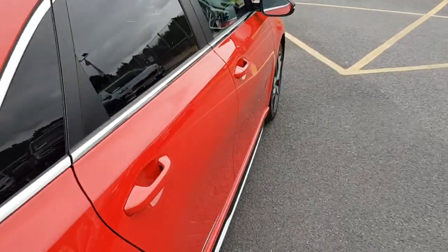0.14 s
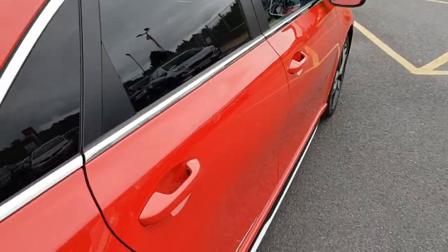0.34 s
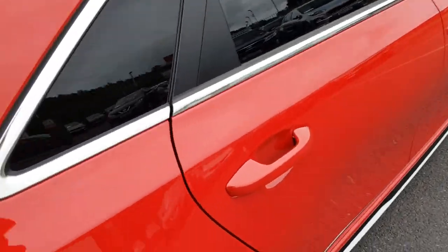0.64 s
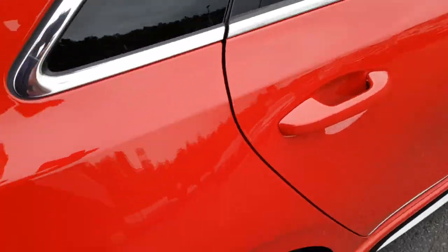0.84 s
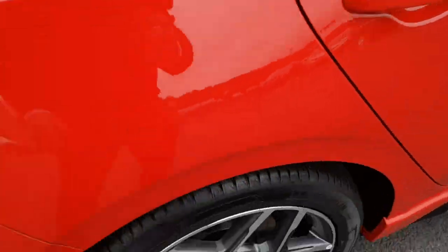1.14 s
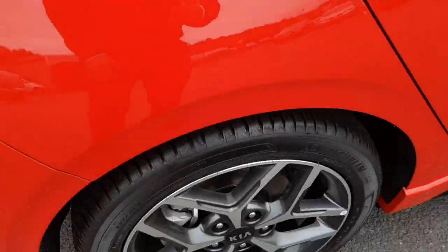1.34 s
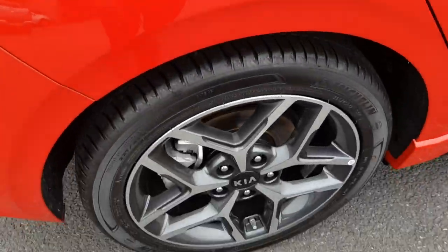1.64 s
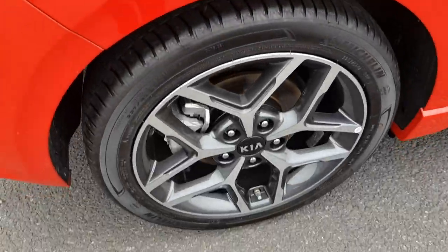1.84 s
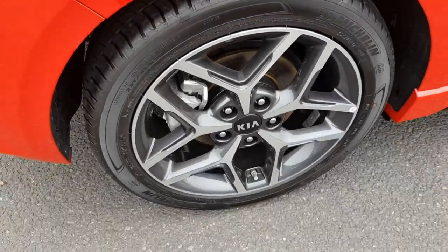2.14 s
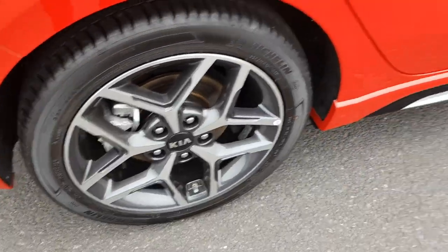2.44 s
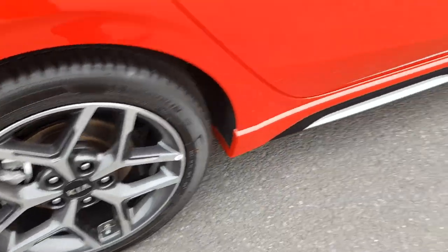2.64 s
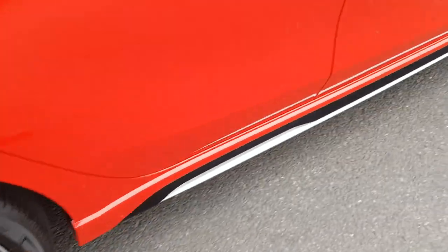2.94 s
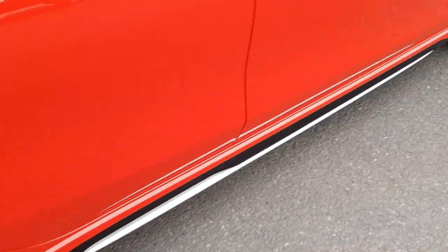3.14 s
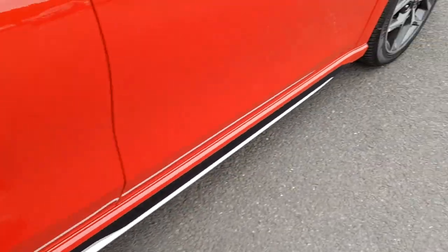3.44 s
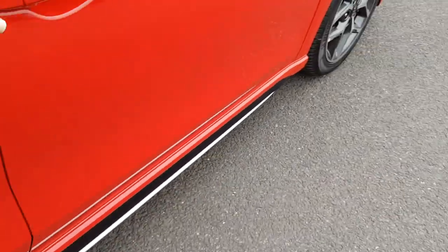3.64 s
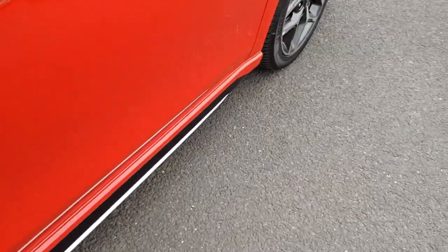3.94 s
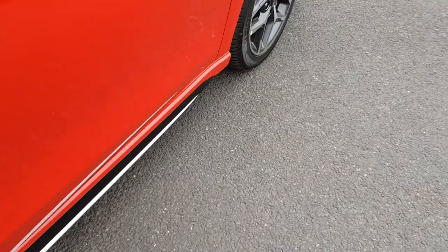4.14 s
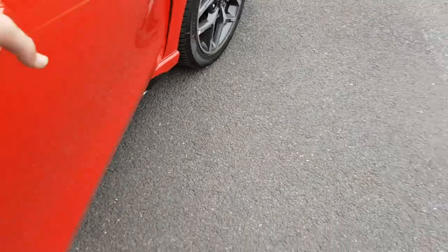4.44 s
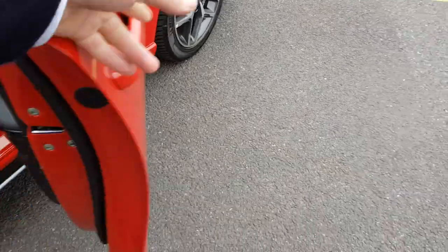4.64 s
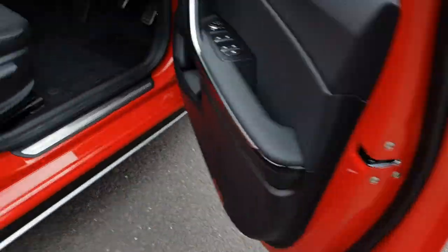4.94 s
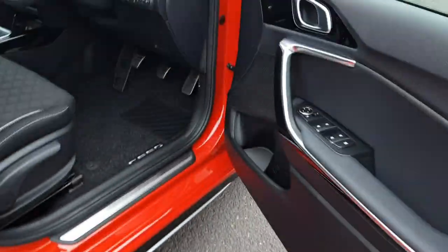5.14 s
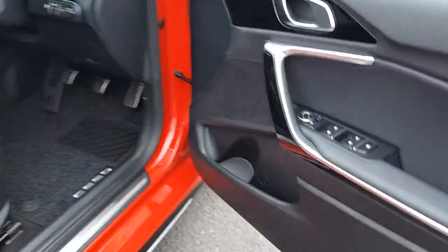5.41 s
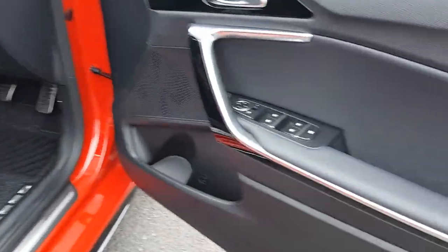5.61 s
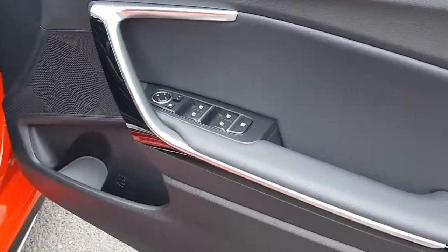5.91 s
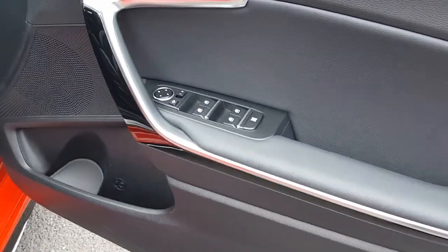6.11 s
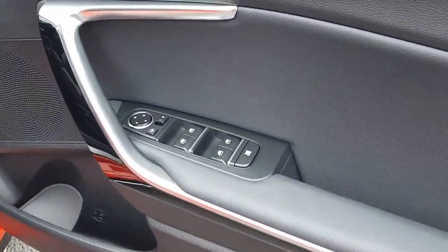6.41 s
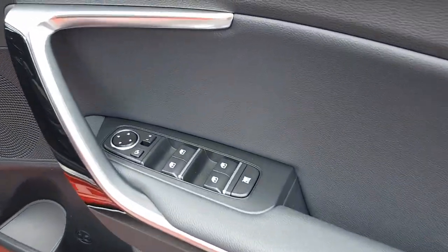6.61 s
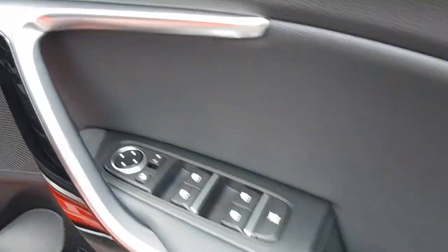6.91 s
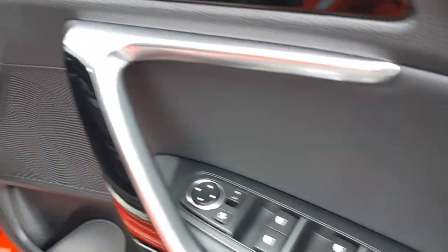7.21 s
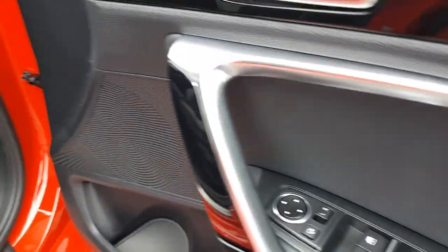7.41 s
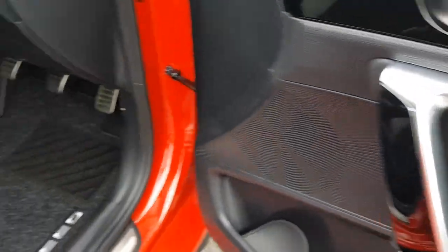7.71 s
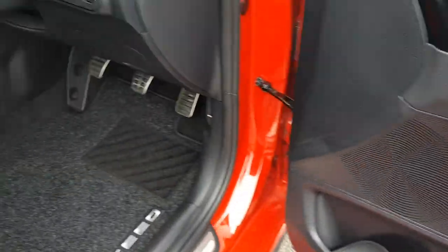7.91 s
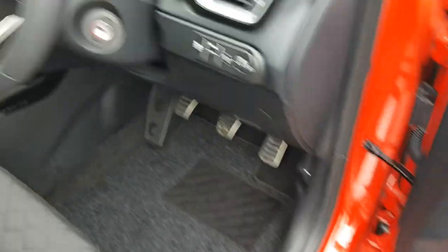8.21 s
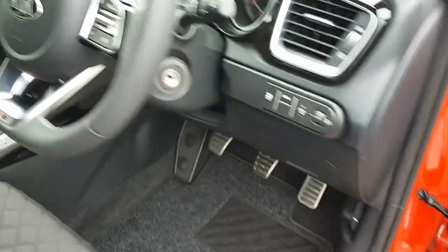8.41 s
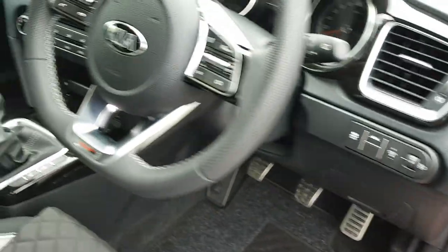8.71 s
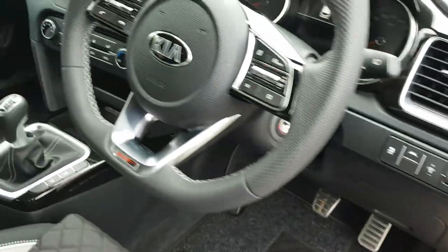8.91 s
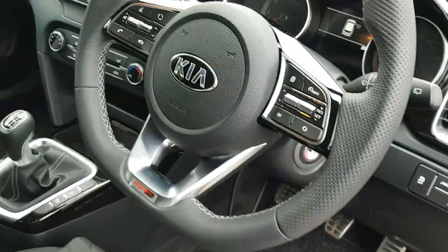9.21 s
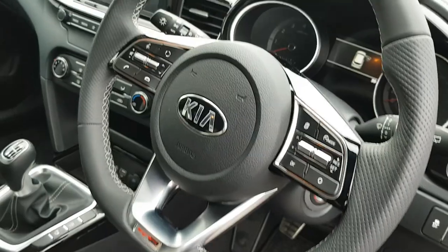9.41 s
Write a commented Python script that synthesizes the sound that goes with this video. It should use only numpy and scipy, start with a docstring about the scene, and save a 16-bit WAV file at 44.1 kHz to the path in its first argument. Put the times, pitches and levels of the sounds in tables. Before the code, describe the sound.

A low engine idle and the wash of road traffic fill a car park throughout, heard from a hand-held microphone. From the start, close on the left, a tailgate sinks with a faint strut hiss and hinge rub. At about 0.8 seconds it slams, the loudest sound: a deep boom with a sharp steel latch crash. The whole sound ducks for about two seconds, then recovers. Clothes rustle faintly, with a few tiny ticks. Just after 4 seconds a handle clicks and a car door pops open on the left with a short rattle and hollow thunk, followed by a small knock and a sleeve swish around 4.6 seconds. From about 5 seconds a passing vehicle drones, sinking slightly in pitch, swelling near 7.7 seconds and fading after 8.5. Around 8 seconds the rumble drops, staying softer until the end at about 9.5 seconds.

```python
"""A car park: an engine idles and traffic goes by. Close on the left a tailgate sinks on hissing struts and
slams at 0.8 s, steel latch over booming cabin; the hand-held camera, listening through two spaced ports,
ducks its gain for over two seconds. Someone walks along the car, clothes rustling, and at 4 s pulls the
handle of the driver's door, which pops its latch and springs off its seal. A vehicle drones past, sinking
in pitch, and near 8 s the rumble drops as the person leans into the cabin."""
import sys
import numpy as np
from scipy import signal
from scipy.fft import rfft, irfft, next_fast_len
from scipy.io import wavfile
from scipy.ndimage import uniform_filter1d, minimum_filter1d, map_coordinates

SR = 44100
rng = np.random.default_rng(int(sys.argv[2]) if len(sys.argv) > 2 else 0)


def wav_record(signal):
    """Record a signal, one row per channel, as 16-bit PCM in the file named by sys.argv[1]."""
    frames = np.transpose(np.atleast_2d(signal))
    bounded = np.clip(frames, -1, 1)
    # unit amplitude maps onto the largest positive 16-bit level
    quanta = np.round(bounded * 32767).astype(np.int16)
    wavfile.write(sys.argv[1], SR, quanta)


N = 421596
TOP_HZ = 15850  # the camera's band limit


def amp(db):
    """Gain of a level in dB."""
    return 10 ** (np.asarray(db) / 20)


def unit(x):
    """x at rms 1."""
    return x / np.sqrt(np.mean(x ** 2) + 1e-20)


def clock():
    """Time of each sample in seconds."""
    return np.arange(N) / SR


def along(points, hz):
    """Read (f/Hz, value) points on a log frequency axis."""
    freqs, values = np.transpose(points)
    return np.interp(np.log(hz + 1), np.log(freqs + 1), values)


def fader(points):
    """A fader ride: (t/s, value) points joined by straight lines."""
    return np.interp(clock(), *np.transpose(points))


def swells(rows):
    """Gain of smooth strokes that rise and fall around their peaks."""
    return sum(amp(db) / (1 + ((clock() - s) / half_width) ** 2 / 2) ** 2 for s, db, half_width in rows)


def move(middle_s, length_s):
    """Progress of a move, from 0 to 1."""
    return np.clip((clock() - middle_s) / length_s + .5, 0, 1)


def distance(nearest_s, width_s):
    """Distance of a vehicle on a straight road, 1 at its closest."""
    return np.hypot(1, (clock() - nearest_s) / width_s)


def wobble(rate):
    """A smooth random curve, rate knots a second."""
    coarse_t = np.arange(0, N / SR, 1 / 500)
    knots = rng.standard_normal(int(N * rate / SR) + 4)
    return np.interp(clock(), coarse_t, map_coordinates(knots, [coarse_t * rate]))


def filtered(x, response):
    """x times a complex response of frequency."""
    size = next_fast_len(N + SR // 2)
    return irfft(rfft(x, size) * response(np.fft.rfftfreq(size, 1 / SR)), size)[..., :N]


def minimum_phase(spectrum, size=2048):
    """Impulse response of energy 1 with this colour and no pre-ring."""
    cepstrum = irfft(np.log(amp(along(spectrum, np.fft.rfftfreq(size, 1 / SR)))))
    fold = 1 + np.sign(size // 2 - np.arange(size)) * (np.arange(size) > 0)
    response = irfft(np.exp(rfft(cepstrum * fold)))
    return response / np.linalg.norm(response)


def add(track, s, sound):
    """Mix a sound into the track at time s."""
    part = track[..., round(s * SR):][..., :sound.shape[-1]]
    part += sound[..., :part.shape[-1]]


# Stereo width of ambient sound, out of step at the two ports near 1 kHz: f/Hz, left-right correlation
PORT_CORRELATION = [(60, 0.94), (150, 0.89), (300, 0.87), (500, 0.33), (750, 0.15), (1080, -0.5),
                    (1600, -0.013), (2700, -0.018), (5000, -0.024)]

def diffuse(spectrum):
    """Steady stereo noise of rms 1, arriving from all around."""
    size = next_fast_len(N, True)
    hz = np.fft.rfftfreq(size, 1 / SR)
    alike = np.clip(along(PORT_CORRELATION, hz), -1, 1)
    bins = rng.standard_normal((2, 2 * len(hz))).view(complex) * amp(along(spectrum, hz))
    mid, side = irfft(bins * np.sqrt([1 + alike, 1 - alike]), size)[:, :N]
    return unit(np.array([mid + side, mid - side]))


def patchy(x, depth_db):
    """Narrow bands swell and fade at random."""
    bands = signal.stft(x, nperseg=1024)[2]
    patches = uniform_filter1d(rng.standard_normal(bands.shape[1:]), size=3, axis=0)
    patches = unit(uniform_filter1d(patches, size=12, axis=1))
    return unit(signal.istft(bands * amp(depth_db * patches), nperseg=1024)[1][:, :N])


def struck(blows, modes):
    """Blows set off decaying tones; a longer contact dulls the higher ones."""
    out, t = np.zeros(N), np.arange(SR // 2) / SR
    for s, db, contact in blows:
        ring = sum(amp(level - 60 * t / t60) * np.sin(2 * np.pi * hz * t) / (1 + (hz * contact) ** 2)
                   for hz, level, t60 in modes)
        add(out, s, amp(db) * ring * (1 - np.exp(-2 * t / contact)))
    return out


def snaps(contacts, spectrum, scatter):
    """Hard contacts: dense, fast-dying ringing, partly scattered differently to each port."""
    out, t = np.zeros((2, N)), np.arange(SR // 3) / SR
    attack = 1 - np.exp(-t / 0.0001)
    for s, db, t60 in contacts:
        ring = rng.standard_normal(len(t)) + scatter * rng.standard_normal((2, len(t)))
        add(out, s, amp(db - 60 * t / t60) * attack * unit(ring))
    return signal.fftconvolve(out, minimum_phase(spectrum)[None], axes=1)[:, :N]


def from_left(x, lead_ms, shadow_db):
    """The right port hears it later, its treble shaded by the camera body; negative values pan right."""
    def ports(hz):
        shade = amp(shadow_db * np.sqrt(hz / (hz + 3000)) / 2)
        return np.array([shade, np.exp(-2j * np.pi * hz * lead_ms / 1000) / shade])
    return filtered(x, ports)


# Colour of the low bed, deep engine rumble and the traffic roar above it: f/Hz, level/dB
RUMBLE_EQ = [(20, -20), (33, -3), (45, -2), (58, 4.5), (75, 5), (100, 4), (140, -0.5), (220, -41),
             (600, -90)]
ROAR_EQ = [(70, -16), (120, -6), (190, 2.5), (280, -8), (400, -7.5), (540, -8.5), (1000, -47),
           (3000, -77.5)]

def engines():
    """Rumble, an idling note and a low roar, screened in turn by the car's rear, door and cabin."""
    clear_of_rear, behind_door, in_cabin = move(3.67, 0.68), move(5.3, 1.9), move(8.25, 1)
    idle_hz, rear_loss_db, rumble_loss_db, roar_loss_db = 59.3, 3, 6, 2
    note = np.sqrt(2) * np.sin(2 * np.pi * np.cumsum(idle_hz + 0.45 * wobble(3.76)) / SR)
    idle = amp(-32 - 5.1 * behind_door + 1.6 * wobble(5.7)) * note
    rumble = amp(-rumble_loss_db * in_cabin) * (amp(-33.5) * diffuse(RUMBLE_EQ) + idle)
    roar_db = -38 - roar_loss_db * in_cabin + 1.5 * wobble(12)
    roar = amp(roar_db) * patchy(diffuse(ROAR_EQ), depth_db=0.5)
    shelter = amp(-rear_loss_db * (1 - clear_of_rear))
    return shelter * (rumble + roar) * amp([[.5], [-.5]])  # leans slightly left


# Fader ride of the tyre wash from the road: t/s, level/dB
TYRE_RIDE = [(0, -29.5), (.6, -27), (1.5, -33), (3.1, -30.5), (4.7, -30), (5.9, -34.5), (6.7, -32),
             (8.3, -34), (9.56, -32)]
# Swells of tread hum as cars pass: t/s, level/dB, half-width/s
TREAD_SWELLS = [(.5, -31, 0.42), (7.8, -36, 1.3)]
# Colour of the broad wash and of the narrow hum: f/Hz, level/dB
TYRE_EQ = [(250, -15), (500, -7.5), (720, -3.5), (930, 1.5), (1120, -1), (1350, -6.5), (1900, -14.5),
           (2500, -23), (3300, -29.5), (4500, -38), (6800, -47.5), (8000, -49.5), (9500, -69), (15000, -54)]
TREAD_EQ = [(600, -35), (770, 5), (850, 6), (1040, 4.5), (1230, -14), (2500, -70)]

def tyres():
    """Tyres wash in from a road to the right, and the tread of nearer cars hums by."""
    road = from_left(diffuse(TYRE_EQ)[0], lead_ms=-0.46, shadow_db=-2.5)
    wash_db = fader(TYRE_RIDE) + 0.19 * wobble(9.7)
    wash = amp(wash_db) * patchy(diffuse(TYRE_EQ) + amp(-4.0) * road, depth_db=1.5)
    return wash + swells(TREAD_SWELLS) * diffuse(TREAD_EQ)


# Fader rides of the two hollows: t/s, level/dB
LOW_HOLLOW_RIDE = [(0, -44), (1.2, -46.5), (3.2, -40), (3.95, -36), (4.3, -37), (6.15, -44.5), (6.55, -36),
                   (7.1, -36.5), (7.6, -30), (8.4, -45.5)]
HIGH_HOLLOW_RIDE = [(0, -50), (1.7, -64), (3.9, -36), (4.3, -39), (5.0, -30.5), (6.1, -45.5), (7.2, -45),
                    (7.65, -35.5), (9.56, -48.5)]
# Their resonant humps: f/Hz, level/dB
LOW_HOLLOW_EQ = [(150, -23), (230, -0.5), (290, 0.5), (350, -5.5), (480, -29), (900, -65)]
HIGH_HOLLOW_EQ = [(300, -39), (520, -11.5), (640, -3.5), (730, 0), (850, -5), (1200, -37), (3000, -70)]

def hollows():
    """Air beside the car and in its doorway rings with the traffic, swelling as the camera goes by."""
    low = amp(fader(LOW_HOLLOW_RIDE) + 2.1 * wobble(22)) * diffuse(LOW_HOLLOW_EQ)
    high = amp(fader(HIGH_HOLLOW_RIDE) + 0.76 * wobble(11)) * diffuse(HIGH_HOLLOW_EQ)
    return low + high


# Partials of the exhaust drone: multiple of the exhaust note, level/dB
EXHAUST_ORDERS = [(1 / 2, -6.5), (2 / 3, -5.5), (1, 0)]
# Airy top of the pass-by: f/Hz, level/dB
PASS_HISS_EQ = [(1200, -29), (2500, 6), (3500, 1), (5000, -4.5), (7000, -13), (8000, -6.5), (9500, -30),
                (15000, -33)]

def passing_vehicle():
    """An uneven exhaust note sinks by the Doppler shift; hiss and roar fall off with distance."""
    exhaust_hz, doppler_share, nearest_s, bend_s = 135.8, .086, 5.1, 1.05
    t = clock()
    receding = (t - nearest_s) / bend_s / distance(nearest_s, bend_s)
    pitch_hz = exhaust_hz * (1 - doppler_share * receding) + 0.69 * wobble(8)
    phase = 2 * np.pi * np.cumsum(pitch_hz) / SR + 0.25 * wobble(30)
    db = -36.5 - 3 * np.maximum(6.1 - t, 0) - 19 * np.maximum(t - 8.5, 0)  # slow rise, hold, quick fade
    exhaust = sum(amp(db + level + 1.16 * wobble(11)) * np.sqrt(2) * np.sin(order * phase)
                  for order, level in EXHAUST_ORDERS)
    hiss = amp(-54.5 + wobble(8)) / distance(nearest_s=7.43, width_s=1.0) ** 2 * diffuse(PASS_HISS_EQ)
    roar = amp(-35) / distance(nearest_s=7.76, width_s=0.38) ** 2 * diffuse(ROAR_EQ)
    return exhaust + hiss + roar


# Reverb decay of the car park: f/Hz, t60/s
CAR_PARK_DECAY = [(100, 0.13), (400, 0.37), (900, 0.68), (3000, 0.22), (12000, 0.4)]

def car_park_reverb(x):
    """A tail from parked cars and walls; each frequency dies at its own speed."""
    hz, t, bands = signal.stft(rng.standard_normal((2, SR)), SR, nperseg=256)
    decay = amp(-60 * t / along(CAR_PARK_DECAY, hz)[:, None])
    tail = signal.istft(bands * decay, SR, nperseg=256)[1]
    return signal.fftconvolve(x, tail / np.linalg.norm(tail[0]), axes=1)[:, :N]


# The arm swings, reaches for the handle and draws the door open: t/s, level/dB, half-width/s
ARM_SWELLS = [(2.25, -72, .1), (3.98, -59.5, .1), (4.54, -46, 0.15), (4.86, -50, 0.14), (5.35, -66, 0.29)]
# Single bright sleeve swishes: t/s, level/dB, half-width/s
SLEEVE_SWELLS = [(1.12, -58, 0.044), (1.26, -58, 0.05), (1.47, -60, 0.067), (2.36, -67, .08),
                 (2.76, -61, .065), (3.62, -56, 0.43), (6.0, -61, .04), (6.24, -60, 0.054),
                 (6.45, -58.5, 0.15), (6.8, -64, 0.045), (7.05, -64, .04), (7.3, -65, .04),
                 (7.55, -60, .05), (7.8, -62, 0.067), (8.05, -62, .04), (8.32, -62, .04), (8.55, -64, .05),
                 (8.86, -64, 0.056)]
# Colour of the rustle and of the swishes: f/Hz, level/dB
CLOTH_EQ = [(1200, -9), (3200, 6), (6800, -3), (8300, 1), (10000, -0.5), (14000, -1.5), (16000, -18)]
SLEEVE_EQ = [(5000, -11), (9000, -8), (13000, -3), (14800, -6), (16000, -14)]

def clothes():
    """Cloth rustles with the walk and each move of the arm, then settles; sleeves swish."""
    settle_s, settle_db_per_s = 5.6, 0.6
    walk = amp(-62 - settle_db_per_s * np.maximum(clock() - settle_s, 0))
    uneven_db = .6 * wobble(8) + .7 * wobble(50)
    rustle = (walk + swells(ARM_SWELLS)) * amp(uneven_db) * diffuse(CLOTH_EQ)
    return rustle + swells(SLEEVE_SWELLS) * diffuse(SLEEVE_EQ)


# Ticks of the handle, the lock and grit underfoot: t/s, level/dB, t60/s, low cut/Hz
SMALL_CLICKS = [(0.154, -50, .02, 11000), (0.5406, -37, 0.033, 6000), (0.6874, -46.5, .07, 12000),
                (0.874, -23, 0.0091, 3000), (1.4891, -50, .08, 11000), (3.526, -46, .015, 9000),
                (4.0425, -47, .03, 2500), (4.056, -42, .025, 3000), (4.0665, -33, 0.028, 6000),
                (4.106, -33, .012, 8000), (4.2888, -39, .012, 12500), (4.5653, -32, .016, 3500),
                (5.3603, -50, .015, 8000)]

def clicks(scatter):
    """Tiny hard contacts on the left; the smaller the part, the higher its sound begins."""
    out, t = np.zeros((2, N)), np.arange(SR // 5) / SR
    for s, db, t60, low_cut_hz in SMALL_CLICKS:
        ring = rng.standard_normal(len(t)) + scatter * rng.standard_normal((2, len(t)))
        band = signal.butter(2, [low_cut_hz, TOP_HZ], "band", fs=SR, output="sos")
        add(out, s, amp(db - 60 * t / t60) * unit(signal.sosfilt(band, ring)))
    return from_left(out, lead_ms=0.385, shadow_db=12.0)


# The pawl springs back: t/s, level/dB, contact/s
PAWL_HITS = [(4.1122, -13, 0.000023)]
# Its short steel ping: f/Hz, level/dB, t60/s
PAWL_RING = [(1050, -9, 0.018), (1350, -9, 0.038), (2200, -4, 0.0081), (3440, -8, 0.0081)]
# The handle takes up its slack and the lock rattles open: t/s, level/dB, t60/s
LOCK_RATTLE = [(4.042, -25, 0.036), (4.056, -25, .03), (4.0685, -23, 0.036), (4.1122, -7, 0.0075),
               (4.114, -20.5, 0.093), (4.1215, -23, 0.052), (4.139, -24, .015)]
# Colour of that rattle: f/Hz, level/dB
LOCK_EQ = [(300, -7), (700, -2), (1150, 6), (1600, -1), (2200, -16), (3500, -14.5), (5000, -29),
           (8000, -34), (16000, -30)]
# The door pops off its seal, then its check strap passes a notch: t/s, level/dB, contact/s
DOOR_HITS = [(4.103, -11, 0.001), (4.1105, -16, 0.0011), (4.1245, -11.5, 0.0024), (4.140, -30, .0015),
             (4.571, -25.5, 0.0014)]
# Hollow thunk of the door skin: f/Hz, level/dB, t60/s
DOOR_RING = [(78.5, -1, 0.077), (150, -4, 0.047), (207, 3.5, 0.051), (310, 7.5, 0.036), (394, -0.5, 0.043),
             (460, -6, 0.044)]

def door():
    """The pawl lets go, the door springs off its seal and swings through a notch."""
    lock = struck(PAWL_HITS, PAWL_RING) + snaps(LOCK_RATTLE, LOCK_EQ, scatter=0.56)
    return from_left(lock + struck(DOOR_HITS, DOOR_RING), lead_ms=0.36, shadow_db=7.5)


# The strut hiss peaks in mid-travel: t/s, level/dB, half-width/s
STRUT_SWELL = [(.42, -53, 0.38)]
# Colour of the bright struts and of the duller hinge rub: f/Hz, level/dB
STRUT_EQ = [(1500, -25.5), (4000, -5), (6000, -6), (7000, -5), (8000, 5), (8800, -3), (9600, 3), (11000, 1),
            (13500, 4), (16000, -5)]
HINGE_EQ = [(200, -38), (300, -3), (370, -3.5), (500, -19), (800, -18), (1200, -0.5), (1500, -8),
            (2500, -30), (6000, -70)]

def tailgate_sinking(shut_s):
    """Struts hiss on the left and hinges rub, both fading out as the tailgate shuts."""
    t, fade_s = clock(), .05
    moving = np.clip((shut_s + fade_s - t) / fade_s, 0, 1)
    hiss = swells(STRUT_SWELL) * amp(.7 * wobble(32)) * diffuse(STRUT_EQ) * amp([[3.5], [-5]])
    rub_db = -33.0 + 5.2 * np.minimum(t - shut_s, 0) + 1.5 * wobble(24.2)  # louder as it gathers speed
    return moving * (hiss + amp(rub_db) * diffuse(HINGE_EQ))


# Soft thuds: a hand takes hold, then the seal touches, lands and rebounds: t/s, level/dB, contact/s
TAILGATE_HITS = [(0.545, -29, 0.00052), (0.8212, -6, 0.00095), (0.8265, -5.5, 0.0032), (0.8355, 7, 0.0054),
                 (0.8545, 2, 0.0071)]
# Boom of the tailgate and the cabin air: f/Hz, level/dB, t60/s
TAILGATE_RING = [(48.4, 2, 0.15), (63.8, -1.5, 0.21), (87.1, 0.5, 0.37), (113, -13.5, 0.078),
                 (152.6, -12, 0.29), (209, -2, 0.14), (264.6, -5, 0.14), (390, 0, 0.085), (424, -8, 0.097)]
# The body shell shudders in many close modes: t/s, level/dB, t60/s
SHELL_SHUDDER = [(.83, -2.5, 0.31)]
# The latch claw strikes home: t/s, level/dB, contact/s
CLAW_HITS = [(0.8262, -10, .00003)]
# Bright tones that colour the slam's crash: f/Hz, level/dB, t60/s
SLAM_BRIGHT_RING = [(829, 3, 0.12), (1093, 3.5, 0.11), (1990, -3, .035), (2690, -16, .05),
                    (3180, -14, 0.049), (3580, -22.5, 0.059), (4000, -18, 0.11), (6100, -6, 0.047),
                    (7450, -16, 0.044), (13060, -14.5, .05)]
# The claw snaps round the striker and the trim chatters: t/s, level/dB, t60/s
LATCH_CHATTER = [(0.8207, -19, 0.026), (0.826, 1.5, 0.0075), (0.8276, -4, 0.023), (0.8297, -3, 0.013),
                 (0.835, -17, 0.22), (0.862, -28.5, 0.028)]
# Colour of the dark shudder and of the steely chatter: f/Hz, level/dB
SHELL_EQ = [(30, -25), (55, -3.5), (90, 6.5), (170, -4), (330, -2.5), (500, -13), (2000, -66)]
LATCH_EQ = [(300, -20.5), (650, -4), (860, 10.5), (1120, 0), (1500, -4), (2000, -2), (2500, -7),
            (3200, -5.5), (4600, -15), (5900, -14.5), (7200, -15.5), (13000, -14), (16000, -26)]

def tailgate_slam():
    """The seal lands and the cabin booms for weight; the steel latch crashes on top for bite."""
    boom = struck(TAILGATE_HITS, TAILGATE_RING) + snaps(SHELL_SHUDDER, SHELL_EQ, scatter=0.17)
    crash = struck(CLAW_HITS, SLAM_BRIGHT_RING) + snaps(LATCH_CHATTER, LATCH_EQ, scatter=1.0)
    return from_left(boom + crash, lead_ms=0.416, shadow_db=10.5)


def scene():
    """The car up front with a faint reverb, the person's foley, and the street bed behind."""
    car = tailgate_sinking(shut_s=LATCH_CHATTER[0][0]) + tailgate_slam() + door()
    reverb = amp(-15.0) * car_park_reverb(car)
    foley = clothes() + clicks(scatter=0.92)
    street = engines() + tyres() + hollows() + passing_vehicle()
    return street + reverb + foley + car


def gain_control(x):
    """A loud sound turns the gain down at once; it creeps up during a hold, then recovers."""
    ceiling_db, hold_s, creep_db_per_s, recover_db_per_s = -4, 2.04, 0.93, 11
    t, window, hold = clock(), SR // 100, int(hold_s * SR)

    def release(db, db_per_s):
        return np.minimum.accumulate(db - db_per_s * t) + db_per_s * t

    power = np.abs(uniform_filter1d(np.mean(x ** 2, axis=0), window))
    headroom_db = ceiling_db - 10 * np.log10(power + 1e-12)
    needed_db = minimum_filter1d(np.minimum(headroom_db, 0), 2 * window)
    held_db = minimum_filter1d(needed_db, hold, origin=(hold - 1) // 2, mode="nearest")
    gain_db = np.maximum(release(needed_db, creep_db_per_s), release(held_db, recover_db_per_s))
    return x * amp(uniform_filter1d(gain_db, window))


def record(dry):
    """The camera cuts the sub-bass, ducks its gain, rounds off peaks and drops the very top."""
    low_cut = signal.butter(5, 34, "high", fs=SR, output="sos")
    ducked = gain_control(signal.sosfilt(low_cut, dry))
    rounded = ducked / (1 + np.abs(ducked) ** 6) ** (1 / 6)
    return filtered(rounded, lambda hz: hz < TOP_HZ)


dry = scene()
out = record(dry)
wav_record(out)
```